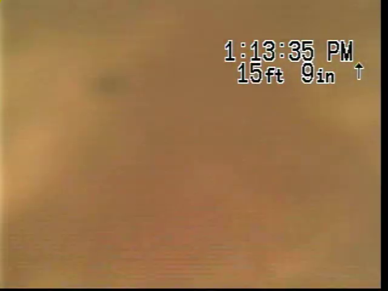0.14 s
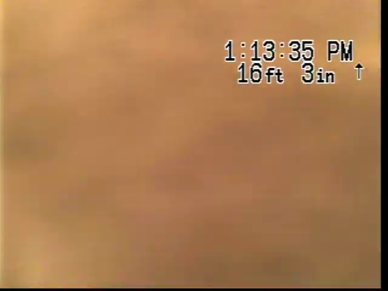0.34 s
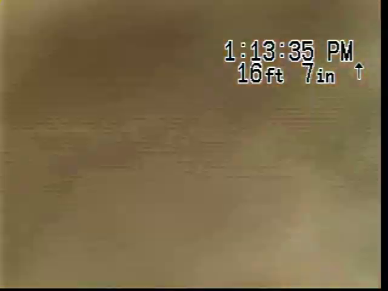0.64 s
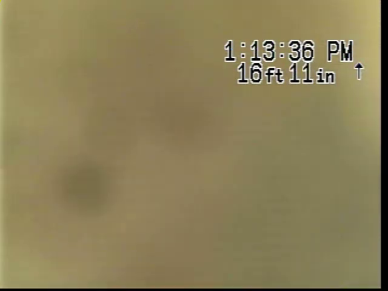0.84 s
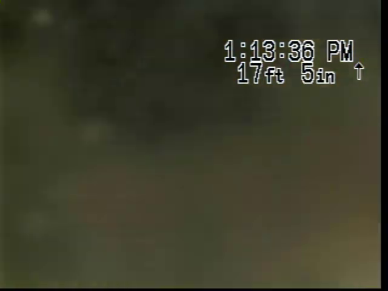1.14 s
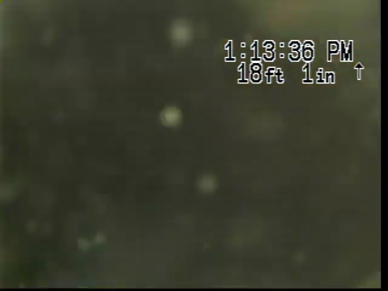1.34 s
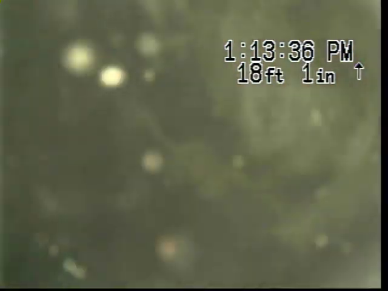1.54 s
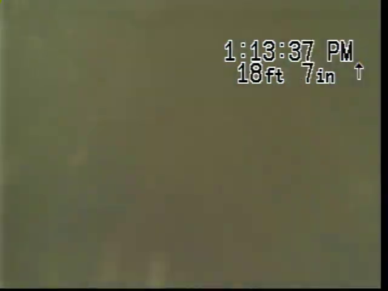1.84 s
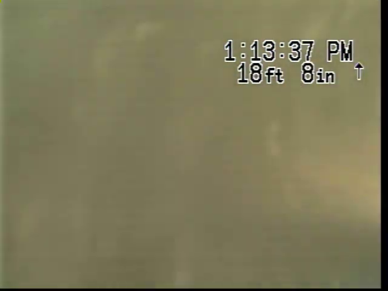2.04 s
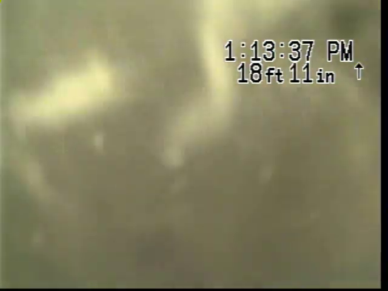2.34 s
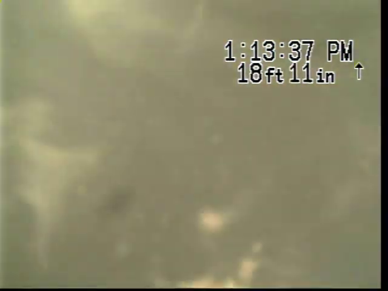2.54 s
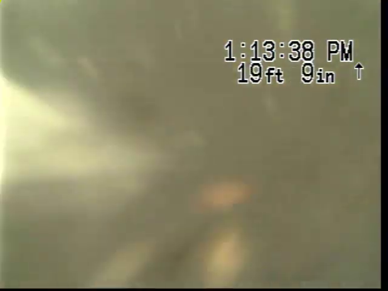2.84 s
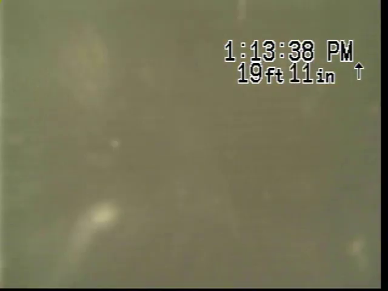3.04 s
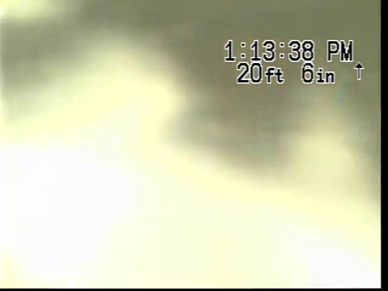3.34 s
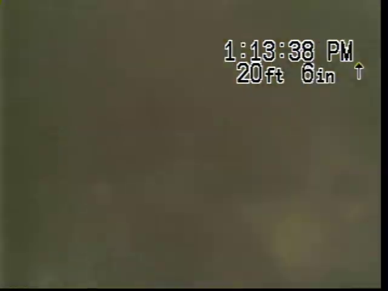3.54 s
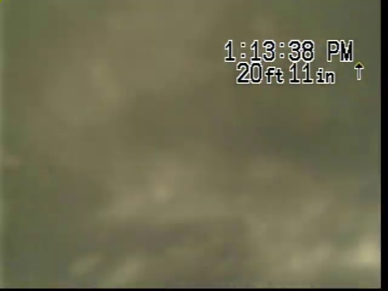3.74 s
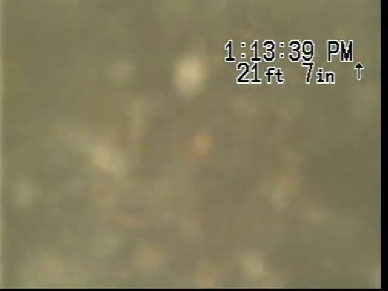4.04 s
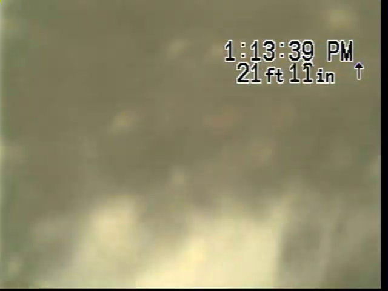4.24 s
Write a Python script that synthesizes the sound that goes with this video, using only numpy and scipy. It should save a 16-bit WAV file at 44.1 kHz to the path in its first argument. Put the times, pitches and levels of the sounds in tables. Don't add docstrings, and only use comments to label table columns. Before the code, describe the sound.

A dry, close indoor sound: a stiff sheathed cable is pushed hand over hand into a plastic pipe. The rubbing is a bright, nasal, ringing hiss, rising and falling in overlapping strokes, strongest around 0.45 seconds, softer around 1.5 to 2, then swelling again near 3.1, 4.1 and the end. Behind it a loose reel cage rumbles in quiet lurches with dull hub bumps. Light slaps and knocks scatter through the first second, with sharper clacks at 1.06 and 1.39. The loudest slam, bright and metallic, hits at 1.92; another rings at 2.56. A quick crackle of grit snaps and hard knocks comes at 2.75 to 2.84, smaller taps near 3.0. From 3.1 to 4.0 mostly scraping remains, then clacks around 4.1 and a triple-contact slam at 4.39. Constant electronic hiss, faint fan hum, soft ticking and a very high thin whine continue underneath.

```python
import sys
import numpy as np
from scipy import signal
from scipy.fft import rfft, irfft
from scipy.io import wavfile

SR = 44100
rng = np.random.default_rng(int(sys.argv[2]) if len(sys.argv) > 2 else 0)


def attenuation_scalar(level_db):
    decades = np.asarray(level_db, float) / 20
    return 10 ** decades


def dump(signal):
    limited = np.clip(np.atleast_2d(signal).T, -1, 1)
    pcm = np.round(limited * 32767).astype(np.int16)
    wavfile.write(sys.argv[1], SR, pcm)


N = 194481
TIME = np.arange(N) / SR


def rms_one(x):
    return x / np.sqrt(np.mean(x ** 2) + 1e-20)


def drift(rate):
    r = np.exp(-2 * np.pi * rate / SR)
    wander = signal.lfilter([1], [1, -2 * r, r * r], rng.standard_normal(N + SR))
    return rms_one(wander[SR:])


def coloured(x, spectrum):
    hz, level_db = np.transpose(spectrum)
    bins_hz = np.arange(N // 2 + 1) * SR / N
    gain = attenuation_scalar(np.interp(np.log(bins_hz + 1), np.log(hz), level_db))
    return rms_one(irfft(rfft(x) * gain, N))


def resonant(x, peaks, wander_db):
    out = 0
    for hz, width_hz, level_db in peaks:
        r = np.exp(-np.pi * 1.55 * width_hz / SR)
        b = (1 - r * r) / 2 * np.array([1, 0, -1])
        a = [1, -2 * r * np.cos(2 * np.pi * hz / SR), r * r]
        twice = signal.lfilter(b, a, signal.lfilter(b, a, x))
        out = out + attenuation_scalar(level_db + wander_db * drift(7.7)) * twice
    return rms_one(out)


def ring(strike, hz, t60):
    r, w = attenuation_scalar(-60 / (t60 * SR)), 2 * np.pi * hz / SR
    return signal.lfilter([0, np.sin(w)], [1, -2 * r * np.cos(w), r * r], strike + 1e-18)


def clicks(times, level_db):
    out = np.zeros(N)
    places = np.round(np.asarray(times) * SR).astype(int)
    np.add.at(out, np.clip(places, 0, N - 1), attenuation_scalar(np.asarray(level_db)))
    return out


def bandpass(x, low_hz, high_hz, order):
    return signal.sosfilt(signal.butter(order, [low_hz, high_hz], "band", fs=SR, output="sos"), x)


def friction(per_s, spread_db, share):
    sizes = attenuation_scalar(spread_db * np.minimum(rng.exponential(1, N), 3.0)) * rng.choice([-1, 1], N)
    smooth = rng.standard_normal(N)
    grains = sizes * (rng.random(N) < per_s / SR)
    return smooth + share * rms_one(grains)


def swells(s, length, level_db, rest_db):
    phase = np.clip((TIME[:, None] - s) / length, -.5, .5)
    power = np.cos(np.pi * phase) ** 2
    return 10 * np.log10(power @ attenuation_scalar(2 * level_db) + attenuation_scalar(2 * rest_db))


# f/Hz, level/dB per Hz
BOX_HISS = [(15, -29), (40, -21), (120, -12), (250, -15), (330, -7.5), (450, -17.5), (1100, -19),
            (2100, -18.5), (2770, -11), (3340, -13), (4400, 2), (6500, -15.5), (9000, -75), (12000, -49),
            (16000, -12.5)]
# f/Hz, width/Hz, level/dB
JET = [(7500, 650, 8.5), (7727, 147, 11.5), (8130, 160, 10.5), (7950, 160, 14)]
# multiple of the fan pitch, level/dB rms
FAN = [(1, -64.5), (2, -70.5), (3, -67.5), (4, -60), (5, -65.5), (8, -60)]
# t/s of the first, level/dB
RETRACE = [
    (.0144, -32),
    (.0152, -33),
    (.0164, -37),
]


def control_box():
    fan_hz, rotor_hz, scan_hz, field_hz = 187.17, 45, 15734.54, 59.94
    hiss = attenuation_scalar(-47) * coloured(rng.standard_normal(N), BOX_HISS)
    jet = attenuation_scalar(-48) * resonant(rng.standard_normal(N), JET, wander_db=-0.1)
    fan = 0
    for k, db in FAN:
        fan = fan + np.sqrt(2) * attenuation_scalar(db) * np.sin(2 * np.pi * (round(k) * fan_hz * TIME + rng.random()))
    rotor = np.sqrt(2) * attenuation_scalar(-78) * np.sin(2 * np.pi * rotor_hz * TIME)

    beats_per_s, first_beat_s, beat_s = 4.98, .1005, .0018
    lag = (((TIME - first_beat_s) * beats_per_s + .5) % 1 - .5) / beats_per_s
    either_way = rng.choice([-1, 1], 30)[(TIME * beats_per_s).astype(int)]
    pulse = lag / beat_s * np.exp(-.5 * (lag / beat_s) ** 2)
    beat = either_way * attenuation_scalar(-54 + 1.4 * drift(3.8)) * pulse

    edges = sum(clicks(np.arange(s, N / SR, 1 / field_hz), db) for s, db in RETRACE)
    ticks = bandpass(edges * attenuation_scalar(2.0 * drift(3)), 12000, 17000, order=2)
    whistle = np.sqrt(2) * attenuation_scalar(-57.5) * np.cos(2 * np.pi * scan_hz * TIME)
    return hiss + jet + fan + rotor + beat + whistle + ticks


# f/Hz, level/dB per Hz
RUMBLE = [(60, -65), (140, -1.5), (220, -10.5), (330, 3.5), (420, -7.5), (560, 0), (750, 1), (1000, 1),
          (1600, -0.5), (2200, 3), (3000, -20)]
# middle t/s, length/s, level/dB
LURCHES = [(0.0, 0.17, -51), (0.332, .25, -54.5), (0.561, 0.14, -46), (0.718, 0.24, -47.5),
           (0.996, 0.47, -50.5), (1.22, .22, -47.5), (1.446, 0.31, -54.5), (1.94, 0.25, -49.5),
           (2.096, 0.25, -52), (2.244, 0.14, -50.5), (2.896, 0.15, -53), (3.04, .14, -55.5),
           (3.422, 0.32, -62), (4.105, 0.43, -52.5), (4.42, 0.32, -47.5)]
# t/s, peak level/dB, f/Hz
BUMPS = [(0.009, -45.5, 357), (0.611, -47, 311), (0.746, -49, 304), (1.396, -49, 228), (1.926, -45.5, 205),
         (2.087, -42.5, 318), (2.262, -49.5, 234), (2.591, -47, 195), (2.895, -51.5, 328),
         (3.053, -45.5, 324), (3.058, -52, 207), (4.066, -48.5, 329), (4.391, -37, 319), (4.394, -34, 427)]
# t/s, level/dB
SWAYS = [
    (0.23, -56),
    (1.54, -59),
    (2.57, -55),
    (3.64, -56),
]


def reel():
    turning_db = swells(*np.transpose(LURCHES), rest_db=-58.5)
    rumble = attenuation_scalar(turning_db + 1.5 * drift(25)) * coloured(friction(400, 5.5, share=0.26), RUMBLE)
    soft = signal.butter(2, 500, fs=SR)
    bumps = sum(ring(signal.lfilter(*soft, clicks([s], [db + 1.0])), hz, 0.15) for s, db, hz in BUMPS)
    sways = sum(attenuation_scalar(db) * np.exp(-((TIME - s) / 0.011) ** 2) for s, db in SWAYS)
    return rumble + bumps + sways


# t/s, level/dB of the low, middle and high modes
BLOWS = [
    (1.920, -26.5, -21, -18),
    (2.567, -38, -29.5, -16),
    (4.39, -18, -36, -29),
]
# f/Hz, level/dB, t60/s
CAGE = [
    [(1300, -6, 0.087), (1710, -2, 0.078), (1870, 6, 0.02)],
    [(3090, 7.5, 0.047), (3960, -14.5, 0.29), (5850, 0, 0.09)],
    [(6220, -1, 0.04), (7450, -8, 0.032)],
]


def cage():
    s, *strength_db = np.transpose(BLOWS)
    out = 0
    for group, blow_db in zip(CAGE, strength_db):
        rattle = signal.lfilter([1], [1, -.985], clicks(s, blow_db - 19.5)) * rng.standard_normal(N)
        out = out + sum(attenuation_scalar(db) * ring(rattle, hz, t60) for hz, db, t60 in group)
    return signal.sosfilt(signal.butter(2, 900, "high", fs=SR, output="sos"), out)


# t/s, peak level/dB, dulled above f/Hz
TICKS = [(0.2453, -29, 11000), (0.2718, -37, 9000), (0.2838, -30, 14000), (1.061, -27, 12000),
         (1.699, -38, 12000), (1.9187, -37, 9000), (2.5633, -41, 7940), (2.7420, -29, 8950),
         (2.7560, -19.5, 7500), (2.7841, -18, 11000), (2.7928, -28, 13300), (2.8208, -23, 6970),
         (2.8245, -32, 8920), (2.8389, -19, 7500), (2.891, -28, 9900), (3.0275, -39, 9930),
         (4.1116, -34, 11000), (4.129, -25, 12960), (4.164, -25, 9000), (4.2474, -32, 9000),
         (4.2662, -34, 8050)]


def grit():
    out, t = np.zeros(N + SR), TIME[:SR // 100]
    for s, peak_db, dull_hz in TICKS:
        snap = rng.standard_normal(len(t)) * attenuation_scalar(-60 * t / 0.0048)
        snap = bandpass(snap, 4800, dull_hz, order=1)
        snap = signal.lfilter(*signal.butter(1, dull_hz, fs=SR), snap)
        out[round(s * SR):][:len(t)] += attenuation_scalar(peak_db) * snap / np.abs(snap).max()
    return out[:N]


def burst(noise, hz, octaves, t60):
    t = TIME[:len(noise)]
    low_hz, high_hz = hz * 2 ** (octaves * np.array([-.5, .5]))
    contact = 0.11 / t60 * (t == 0)
    out = bandpass((noise + contact) * attenuation_scalar(-60 * t / max(t60, .005)), low_hz, high_hz, order=2)
    out = signal.sosfilt(signal.butter(2, 0.57 * low_hz, "high", fs=SR, output="sos"), out)
    out = signal.sosfilt(signal.butter(2, 2.7 * high_hz, fs=SR, output="sos"), out)
    return out / np.abs(out).max()


# t/s, peak level/dB, f/Hz, t60/s
CRACKS = [(0.102, -37, 4200, .03), (0.654, -30, 3750, .043), (0.745, -33, 3000, 0.13),
          (0.915, -26, 4270, .06), (0.919, -27, 4400, 0.046), (1.0605, -17.5, 4200, 0.017),
          (1.307, -34, 2940, .03), (1.3852, -18.5, 3460, 0.027), (1.446, -27, 3630, .14),
          (1.47, -33, 5200, 0.17), (2.102, -35, 2950, .03), (2.245, -25.5, 2970, 0.061),
          (2.454, -29.5, 3040, .05), (2.756, -21, 5200, .022), (2.785, -10.5, 4400, 0.011),
          (2.7935, -21, 3600, .01), (2.977, -26.5, 3050, 0.024), (2.993, -27, 2590, .05),
          (3.336, -44, 2890, 0.023), (4.070, -23, 4390, .037), (4.112, -21, 4900, 0.028),
          (4.166, -25, 4040, .03), (4.348, -21.5, 4020, 0.057)]
# t/s, peak level/dB, f/Hz
THUDS = [(0.222, -34.5, 1220), (0.56, -43, 686), (0.654, -33, 1890), (0.726, -31.5, 1410),
         (0.737, -33, 1600), (0.74, -38, 830), (1.0605, -45, 1114), (1.17, -39, 604), (1.229, -36, 1428),
         (1.24, -48, 600), (1.307, -36, 1300), (1.3852, -24.5, 1460), (1.398, -45, 596), (2.069, -37, 870),
         (2.17, -43, 577), (2.245, -32.5, 1700), (2.25, -44.5, 565), (2.756, -41, 1400),
         (2.7855, -14.5, 2390), (2.7935, -23, 2334), (2.977, -42, 1100), (2.993, -37.5, 1710),
         (3.007, -31, 2100), (3.05, -43, 713.6), (4.070, -36, 1504), (4.112, -33, 2016),
         (4.166, -31.5, 2100)]
# t/s, peak level/dB, spacing/s, loss per contact/dB
SLAMS = [
    (1.919, -7.5, .003, 9),
    (2.5636, -11, .004, 10),
    (4.3875, -12, 0.0052, 1),
]


def knocks():
    bright, dull = list(CRACKS), list(THUDS)
    for s, db, gap, loss_db in SLAMS:
        for k in range(3):
            at_s, contact_db = s + k * gap, db - k * loss_db
            bright.append((at_s, contact_db, 3420, 0.033))
            dull.append((at_s, contact_db - 11.5, 1890 / 2 ** (k * 0.86)))
    hits = [(s, db, hz, t60, 0.95) for s, db, hz, t60 in bright]
    hits += [(s, db, hz, 50 / hz, 0.82) for s, db, hz in dull]
    out, length = np.zeros(N + SR), SR // 8
    for s, db, hz, t60, octaves in hits:
        out[round(s * SR):][:length] += attenuation_scalar(db) * burst(rng.standard_normal(length), hz, octaves, t60)
    return out[:N]


# middle t/s, length/s,
# upper ring level/dB, lower ring level/dB and rustle level/dB relative to the upper
PUSHES = [(0.117, 0.36, -37, -4.3, -21), (0.315, 0.22, -36.5, -5.5, -15.5), (0.452, 0.29, -31, -4.5, -20.3),
          (0.64, 0.41, -34.5, -4.5, -13.5), (0.996, 0.34, -39.5, -0.6, -28), (1.17, 0.38, -37, -3.5, -18.5),
          (1.479, 0.83, -43.5, -2.8, -13), (1.818, 0.32, -40, -2.2, -14.5), (1.978, 0.56, -42.5, -0.7, -19),
          (2.177, 0.26, -35.5, -1.2, -28), (2.298, 0.27, -44, 1.6, -27), (2.564, 0.11, -45.5, 2, -8),
          (2.781, 0.47, -40, -2.3, -15.5), (2.906, 0.35, -37.5, -4.5, -22.5), (3.08, 0.21, -34, -6.5, -17),
          (3.208, 0.25, -39, -6, -15), (3.354, 0.39, -38, -5, -10), (3.513, 0.13, -38, -0.5, -19.8),
          (3.603, 0.38, -37.5, -4, -27), (3.94, 0.3, -39, -3, -16), (4.087, 0.21, -33.5, -4.5, -22.5),
          (4.193, 0.25, -39, -3.5, -18), (4.47, 0.44, -32.5, -4.5, -15)]


def feed():
    s, length, upper_db, lower_db, rustle_db = np.transpose(PUSHES)
    upper = swells(s, length, upper_db, rest_db=-62)
    lower = swells(s, length, upper_db + lower_db + 0.93, rest_db=-55)
    rustle = swells(s, length, upper_db + rustle_db - 3, rest_db=-70)
    return upper, lower, rustle


def sliding_ring(press_db):
    slack_hz, sink_hz_per_db, wander_hz, width_hz = 4523, 23, 109.7, 130
    slow = signal.lfilter(*signal.butter(2, width_hz / 2, fs=SR), rng.standard_normal((2, N)))
    hz = slack_hz - sink_hz_per_db * np.maximum(press_db + 46.5, 0) + wander_hz * drift(5.0)
    turn = 2 * np.pi * np.cumsum(hz) / SR
    return rms_one(slow[0] * np.cos(turn) + slow[1] * np.sin(turn))


# f/Hz, width/Hz, level/dB
UPPER_RING = [(3540, 1400, -8), (3842, 128, 0), (4090, 280, 2), (4569, 650, 3), (5200, 620, -3),
              (5666, 380, -15), (6110, 1000, -9.5), (6860, 1200, -24.5)]
# f/Hz, width/Hz, level/dB
LOWER_RING = [(2100, 2300, -8.5), (2793, 470, 7), (2848, 325, 8)]
# f/Hz, level/dB per Hz
RUSTLE = [(5000, -42), (8500, -5), (9700, 3), (11000, -0.5), (13000, 0), (15500, 0), (17000, -8)]


def cable():
    upper_db, lower_db, rustle_db = feed()
    flutter_db = 0.47 * drift(4.1) + 0.97 * drift(55)
    upper = resonant(friction(1500, 3.1, share=0.36), UPPER_RING, wander_db=1.78)
    upper = upper + attenuation_scalar(-8) * sliding_ring(upper_db)
    lower = resonant(friction(1700, 2.4, share=0.52), LOWER_RING, wander_db=0.6)
    rustle = attenuation_scalar(rustle_db + 0.55 * flutter_db) * coloured(friction(600, 4.5, share=0.33), RUSTLE)
    return attenuation_scalar(flutter_db) * (attenuation_scalar(upper_db - 0.22) * upper + attenuation_scalar(lower_db) * lower) + rustle


def scene():
    return (cable() + reel() + knocks() + cage() + grit() + control_box())[None]


def low_pass(x):
    return signal.sosfilt(signal.butter(12, 15745, fs=SR, output="sos"), x)


def record(dry):
    ceiling = .5
    rounded = ceiling * np.tanh(dry / ceiling)
    filtered = signal.sosfiltfilt(signal.cheby2(12, 30, 16200, fs=SR, output="sos"), rounded)
    return low_pass(filtered)


dry = scene()
out = record(dry)
dump(out)
```